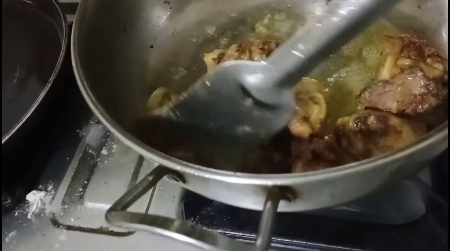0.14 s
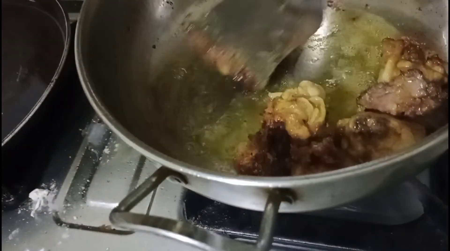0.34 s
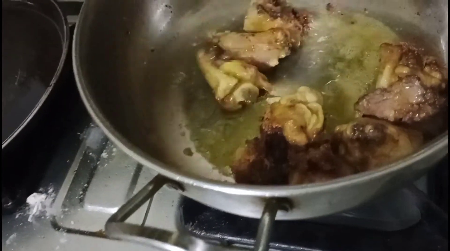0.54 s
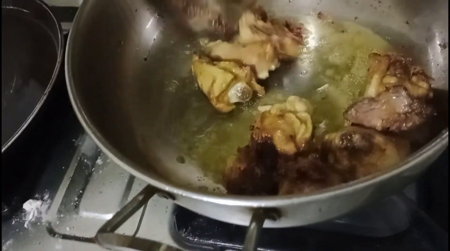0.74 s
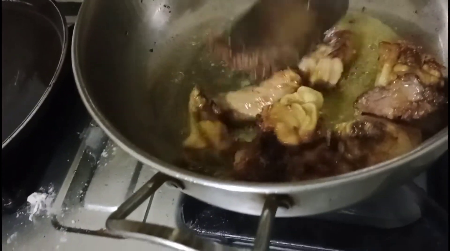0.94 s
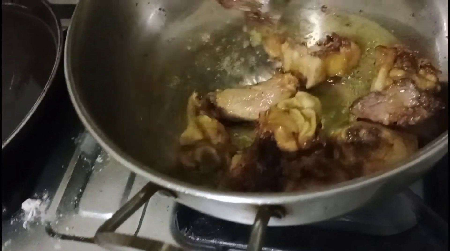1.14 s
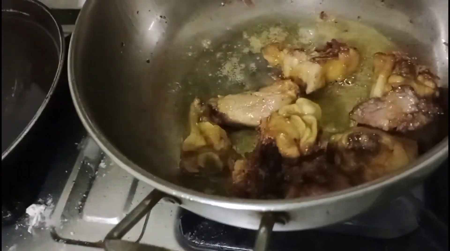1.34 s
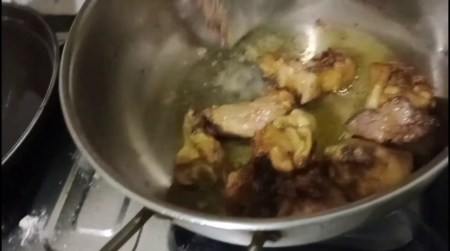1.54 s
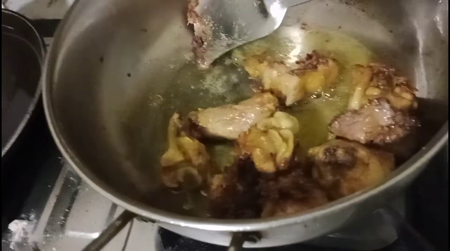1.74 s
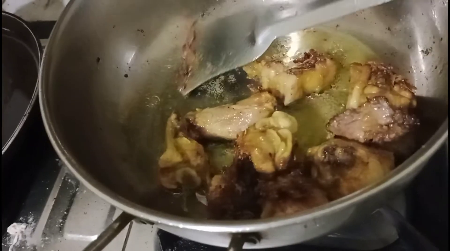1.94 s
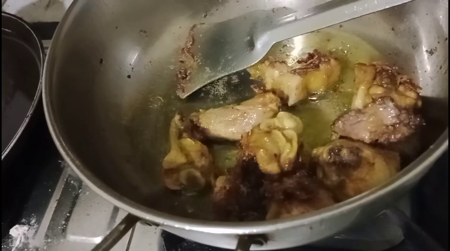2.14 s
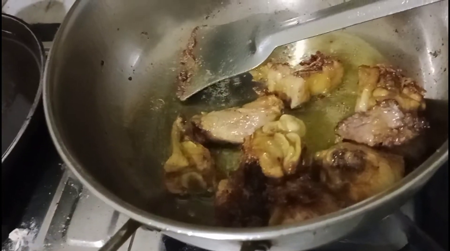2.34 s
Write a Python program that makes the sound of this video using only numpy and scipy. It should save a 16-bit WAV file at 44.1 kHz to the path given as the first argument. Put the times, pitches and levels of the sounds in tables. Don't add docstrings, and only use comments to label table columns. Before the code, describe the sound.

Chicken sizzling and crackling in hot oil while a metal spatula knocks against a steel pan

```python
import sys
import numpy as np
from scipy import signal
from scipy.fft import rfft, irfft
from scipy.io import wavfile
from scipy.ndimage import uniform_filter1d

SR = 44100
rng = np.random.default_rng(int(sys.argv[2]) if len(sys.argv) > 2 else 0)


def waveform_to_disk(signal):
    frames = np.transpose(np.atleast_2d(signal))
    scaled = np.clip(frames, -1, 1) * 32767
    samples = np.round(scaled).astype(np.int16)
    wavfile.write(sys.argv[1], SR, samples)


def voltage_ratio(decibels):
    exponent = np.asarray(decibels, float) / 20
    return 10 ** exponent


N = 110250
MIC_LAG_S = 0.0002495

# time in seconds, level in dB.
HEAT_DB = [(0, -28), (.25, -27), (.6, -26), (.8, -29), (1.0, -25.5), (1.5, -28), (1.7, -27.5), (1.9, -28.5),
           (2.2, -28.5), (2.5, -28)]


def frying():
    bubbles = swarm(1500, 1.7, 3.5, 1080, 11830, clump_db=3.5)
    crackles = swarm(500, 3.8, 1.92, 950, 16800, clump_db=4.5)
    oil = simmer((voltage_ratio(-2.5) * bubbles + voltage_ratio(-6) * crackles) * along(HEAT_DB))
    return oil + large_pops() + dry_snaps()


def hiss():
    return simmer(voltage_ratio(-1) * along(HEAT_DB) * noise(FIZZ_COLOUR, patchy_db=2.5, flicker_db=1.47))


# frequency in Hz, level in dB per Hz.
FIZZ_COLOUR = [(500, -19.5), (1300, -14), (2400, -8), (3700, -1.5), (5200, -1.5), (7400, -4), (9000, -6.5),
               (15600, -19.5)]


def swarm(per_s, spread_db, cycles, low_hz, high_hz, clump_db, count=24):
    clumps = voltage_ratio(clump_db * drift(N, 300, 200))
    bursts = rng.random(N) < clumps * per_s / SR
    size = voltage_ratio(spread_db * np.minimum(rng.exponential(1, N), 2.6)) * bursts
    kind = rng.integers(0, count, N)
    out = np.zeros((2, N))
    for k, (p, c, side) in enumerate(rng.random((count, 3))):
        hz = low_hz * (high_hz / low_hz) ** ((k + p) / count)
        shape = blip(hz, cycles * (0.5 + c), 0.097, MIC_LAG_S * (2 * side - 1))
        shape = shape * np.sqrt(hz / low_hz)
        out += signal.oaconvolve((size * (kind == k))[None], shape, axes=1)[:, :N]
    return evened(coloured(out, FIZZ_COLOUR))


def blip(hz, cycles, glide, lag_s):
    t = np.arange(600) / SR - MIC_LAG_S - np.array([[lag_s], [-lag_s]])
    u = np.maximum(t * hz / cycles, 0)
    swell = u * np.exp(1 - u * 3.9) * 3.98
    return swell * np.sin(2 * np.pi * cycles * u * (1 + glide * u))


# time in seconds, level in dB.
LARGE_DB = [(0, 0), (.3, -1.5), (.48, -1), (.63, 0), (.8, 2.5), (1.1, -2), (1.5, 1.5), (2.0, 3.5),
            (2.35, -2.5)]


def simmer(x):
    low = signal.sosfiltfilt(signal.butter(2, 2950, fs=SR, output="sos"), x)
    return x + (along(LARGE_DB) - 1) * low


POP_S, POP_GLIDE = 0.00077, 0.022
POP_T = np.arange(-200, 200) / SR

# time in seconds, level in dB, pitch in Hz, lead of the left side in radians.
POPS = [(0.0404, -17, 7000, -3), (0.1088, -25, 3680, 5), (0.1761, -19.5, 4500, 1),
        (0.2373, -23.5, 1770, -1.8), (0.239, -17, 4180, 0.1), (0.2512, -16, 3680, 1.9),
        (0.3881, -16, 4600, 1.1), (0.4615, -16, 5440, -2.2), (0.5162, -19, 5000, 1.7),
        (0.6042, -20, 4000, -1.5), (0.6091, -22.5, 2170, 3), (0.641, -20.5, 7300, 0.5),
        (0.6455, -18.5, 2110, 0), (0.646, -14.5, 6640, -2.5), (0.659, -20, 4160, 1.1),
        (0.7061, -35, 9450, 1), (1.0146, -21, 2470, -1), (1.1052, -23, 3660, 1), (1.1623, -28, 5200, -0.5),
        (1.1875, -19, 4200, 0.5), (1.233, -19, 3900, 1.5), (1.3754, -23, 3760, 2),
        (1.4278, -16.5, 3650, -3.0), (1.4641, -20.5, 2430, 0.5), (1.53, -20, 8050, 4),
        (1.7314, -16.5, 4240, 0.5), (1.7463, -28, 1400, -4), (1.7842, -19.5, 4300, -1.5),
        (1.8643, -14, 7050, -2), (1.8905, -16, 5230, 3), (1.9164, -17, 4890, -1.2), (1.9865, -30, 2955, 7),
        (2.0274, -20, 4180, -2), (2.0473, -12, 4680, 4), (2.079, -17, 3960, 0.8),
        (2.1194, -13.5, 4150, -1.7), (2.1372, -16.5, 2300, -1.0), (2.2383, -18, 5200, -1),
        (2.2509, -20, 2530, 0.5), (2.2702, -14.5, 5110, 1.3), (2.3178, -14.5, 7390, -1.9),
        (2.331, -17.5, 5480, 1.5), (2.3419, -20.5, 3320, -0.5), (2.3502, -17.5, 3570, -2.5),
        (2.3938, -17.5, 2860, 3), (2.4257, -22, 3200, -2.5), (2.4555, -20.5, 3800, -2),
        (2.4801, -21, 4260, 0)]


def large_pops():
    out = np.zeros((2, N))
    bell = np.exp(-0.5 * (POP_T / POP_S) ** 2)
    for s, db, hz, lead_rad in POPS:
        turn = 2 * np.pi * hz * POP_T * (1 + POP_GLIDE * POP_T / POP_S)
        turn = turn + np.array([[0.5], [-0.5]]) * lead_rad
        add(out, s + POP_T[0], voltage_ratio(db + 3.5) * bell * np.cos(turn))
    return out


# start in seconds, peak level in dB before the cap, about twice the band centre in
# Hz.
SNAPS = [(0.218, -19, 4000), (0.2413, -9, 3920), (0.2469, -1.5, 4220), (0.2684, -4, 4580),
         (0.2849, -9, 4430), (0.296, -5, 3500), (0.356, 4, 4950), (0.511, -7, 5150), (0.5367, -21, 4630),
         (0.6087, -10, 3840), (0.6463, -7, 4110), (0.705, -7, 6010), (1.0196, -7, 4570),
         (1.2122, -11.5, 4160), (1.256, -7, 4100), (1.285, -9, 4490), (1.3382, -6, 4210),
         (1.467, -10, 4200), (1.5048, -4.5, 4500), (1.5318, -4, 5330), (1.8444, 0, 4050),
         (1.855, -17, 4670), (1.8634, -12, 5940), (1.889, 5, 4730), (2.2771, -15, 4260),
         (2.3186, -1.5, 6300), (2.3757, -9, 4450), (2.3926, -15, 3890)]


def dry_snaps():
    t60_s, width_octaves, level_db, loudest_db = 0.007, 1.35, -3, -9
    out = np.zeros((2, N))
    size = len(POP_T)
    f = np.fft.rfftfreq(size, 1 / SR)
    decay = (POP_T >= 0) * voltage_ratio(-60 * abs(POP_T) / t60_s)
    rows = list(SNAPS) + [(s - POP_S, db + 3, hz) for s, db, hz, _ in POPS]
    for s, db, hz in rows:
        grit = rng.standard_normal((2, size))
        burst = (grit + 0.5 * grit[::-1]) * decay
        band = np.exp(-0.5 * (np.log2((f + 1) / (0.51 * hz)) / width_octaves) ** 2)
        burst = irfft(rfft(burst) * band, size)
        add(out, s + POP_T[0], voltage_ratio(min(db, loudest_db) + level_db) * burst / abs(burst).max())
    return out


# start in seconds, level in dB, t60 in seconds.
SPITS = [
    (0.344, -26, 0.067),
    (0.643, -16, 0.023),
    (0.7037, -14, 0.017),
    (1.512, -25, 0.12),
    (1.835, -20, 0.2),
    (2.033, -22.5, 0.17),
    (2.375, -23.5, 0.041),
]


def spits():
    out = np.zeros((2, N))
    t = np.arange(SR // 4) / SR
    for s, db, t60 in SPITS:
        grit = rng.standard_normal((2, len(t)))
        burst = evened(coloured(grit, [(1000, -20), (4000, -8), (8000, 8), (15000, -16)]))
        add(out, s, burst * np.minimum(t / 0.0033, 1) * voltage_ratio(db - 60 * t / t60))
    return out


def bowl(x, count=7):
    spot = np.repeat(rng.integers(0, count, N // 300 + 1), 300)[:N]
    out = np.zeros((2, N))
    for k in range(count):
        here = uniform_filter1d(1.0 * (spot == k), size=200)
        out += echoes(x * here, 0.00073, 0.009, 0.012)
    return out


# frequency in Hz, level in dB, t60 in seconds.
EDGE_MODES = [(5146, 6.5, 0.078), (5400, 3, 0.05), (6000, 2, 0.056), (6650, 7, .07), (7066, 8, 0.062),
              (7960, 1, 0.033)]
# frequency in Hz, level in dB, t60 in seconds.
FLAT_MODES = [(1850, -4, 0.12), (2720, 7, 0.038), (4050, 11, 0.016), (5760, 6, 0.041), (6100, 5, 0.01),
              (7620, -5, .03), (8600, -26, 0.049)]
# start in seconds, pan in dB, centre of pan ring in Hz, ring length share, blade in dB.
EDGE_KNOCKS = [
    (0.192, -17, 815, 0.83, -22.5),
    (0.7315, -6.5, 720, 0.57, -13),
    (0.7428, -11, 930, 0.11, -18),
    (0.967, -29.5, 604, 0.29, -46),
    (2.165, -29, 700, 0.43, -43),
]
# start in seconds, pan in dB, centre of pan ring in Hz, ring length share, blade in dB.
FLAT_KNOCKS = [
    (0.857, -24.5, 690, 0.48, -30),
    (1.6479, -11.5, 830, 0.32, -10.5),
    (1.742, -26, 1300, 0.13, -48),
    (1.8234, -17.5, 820, 0.94, -14.5),
    (1.8289, -32, 950, 0.99, -10),
    (1.8347, -35, 790, 0.74, -14),
]


def spatula():
    out = drag()
    for blade, rows in ((EDGE_MODES, EDGE_KNOCKS), (FLAT_MODES, FLAT_KNOCKS)):
        for s, *how in rows:
            add(out, s, knock(blade, *how))
    return out


# frequency in Hz, level in dB, t60 in seconds.
PAN_MODES = [(172, -15, 1), (264, -3, 0.48), (389.4, -11, 0.54), (414, -12.5, 0.25), (435, -4, 0.26),
             (547.6, 1, 0.12), (633, 3, 0.2), (686.6, -7, 0.31), (746, -4.5, 0.37), (1000, 3.5, 0.088),
             (1138, 5.5, 0.16), (1314, -18, 0.09), (1580, -14, 0.032)]
# frequency in Hz, level in dB.
CRACK_COLOUR = [(300, -14), (1500, -7), (5000, 13), (9000, 9), (15500, -10)]


def knock(blade, pan_db, centre_hz, length, blade_db):
    size = SR // 3
    t, hz = np.arange(size) / SR, np.fft.rfftfreq(size, 1 / SR)

    def near(f):
        return np.exp(-0.5 * (np.log2((f + 1) / centre_hz) / 0.92) ** 2)

    a, b = rng.standard_normal((2, size))
    thud = evened(irfft(rfft(np.array([a + b / 4, a - b / 4])) * near(hz), size))
    thud = 0.34 * thud * voltage_ratio(6 - 60 * t / (length * 0.13))
    blow = voltage_ratio(1.5 - 60 * t / 0.0057) * np.sin(2 * np.pi * 1.27 * centre_hz * t)
    modes = [(f, db, length * t60) for f, db, t60 in PAN_MODES]
    pan = ring(modes, t, near(np.array(PAN_MODES)[:, :1])) + thud + blow

    crack = coloured(rng.standard_normal((2, size)), CRACK_COLOUR) * voltage_ratio(-60 * t / 0.023)
    crack = crack / abs(crack).max() * voltage_ratio(13.5)
    onset = np.minimum(t / 0.00043, 1)
    return -onset * (voltage_ratio(pan_db) * pan + voltage_ratio(blade_db) * (ring(blade, t) + crack))


# time in seconds, level in dB.
DRAG_PRESSURE_DB = [(0, -61), (.17, -55), (.25, -40.5), (.38, -52), (.45, -56), (.74, -51.5), (.82, -44),
                    (1.05, -47), (1.15, -56.5), (1.6, -54), (1.7, -61), (1.88, -35.5), (2.0, -47),
                    (2.1, -54), (2.3, -58.5), (2.5, -57)]
# frequency in Hz, level in dB.
DRAG_MODES = [(182, 1.5), (292, -7), (345, -13), (425, -0.5), (535, 1)]


def drag():
    slips = voltage_ratio(3.2 * np.minimum(rng.exponential(1, N), 2)) * (rng.random(N) < 300 / SR)
    slips = slips * rng.choice([-1., 1.], N)
    t = np.arange(SR // 2) / SR
    body = ring([(hz, db, 0.3) for hz, db in DRAG_MODES], t)
    hum = evened(signal.oaconvolve(slips[None], body, axes=1)[:, :N])
    rasp_colour = [(120, -14), (350, 0), (750, 4), (1300, -6), (2500, -30)]
    rasp = noise(rasp_colour, patchy_db=2, flicker_db=4.5)
    return along(DRAG_PRESSURE_DB) * (voltage_ratio(-1) * hum + voltage_ratio(-3) * rasp)


# frequency in Hz, correlation up to 1.
LIKENESS = [(60, 0.65), (180, 0.79), (550, 0.62), (1650, 0.54), (4970, 0.16), (15000, -0.24)]


def likeness(hz):
    return np.clip(read(LIKENESS, hz), 0, 1)


def ring(modes, t, weight=1):
    hz, db, t60 = np.transpose(modes)[:, :, None]
    side = rng.choice([-1., 1.], hz.shape) * np.array([1, -1])[:, None, None]
    turn = side * np.pi / 4 * (1 - likeness(hz))
    sines = weight * voltage_ratio(db - 60 * t / t60) * np.sin(2 * np.pi * hz * t + turn)
    return sines.sum(1) / np.sqrt(len(modes))


def noise(points, patchy_db, flicker_db):
    frames, hz = N // 64 + 5, np.fft.rfftfreq(256, 1 / SR)
    patches = uniform_filter1d(rng.standard_normal((129, frames)), size=5, axis=0)
    patches = evened(uniform_filter1d(patches, size=20, axis=1))
    flicker = drift(frames, 8)
    a, b = rng.standard_normal((2, N))
    same = likeness(np.fft.rfftfreq(N, 1 / SR))
    pair = np.array([a, irfft(same * rfft(a) + np.sqrt(1 - same ** 2) * rfft(b), N)])
    z = signal.stft(pair, nperseg=256, noverlap=192)[2]
    gain_db = patchy_db * (-1.5 + (hz[:, None] / 9000) ** 2) * patches + flicker_db * flicker
    z = z * voltage_ratio(gain_db)[:, :z.shape[-1]]
    return evened(coloured(signal.istft(z, nperseg=256, noverlap=192)[1][:, :N], points))


def echoes(x, start_s, t60, length_s):
    slots = np.arange(round(start_s * SR), round(length_s * SR), 20)
    shape = (2, len(slots))
    taps = np.zeros((2, slots[-1] + 20))
    np.put_along_axis(taps, slots + rng.integers(0, 20, shape), rng.choice([-1., 1.], shape), 1)
    taps *= voltage_ratio(-60 * np.arange(taps.shape[1]) / SR / t60)
    taps /= np.linalg.norm(taps, axis=1, keepdims=True)
    return signal.oaconvolve(x, taps, axes=1)[:, :N]


def evened(x):
    return x / np.sqrt(np.mean(x ** 2) + 1e-20)


def drift(shape, *widths):
    x = rng.standard_normal(shape)
    for width in widths:
        x = uniform_filter1d(x, size=width)
    return evened(x)


def read(points, hz):
    f, value = np.transpose(points)
    return np.interp(np.log(hz + 1), np.log(f + 1), value)


def along(curve):
    s, db = np.transpose(curve)
    return voltage_ratio(np.interp(np.arange(N) / SR, s, db))


def add(mix, s, sound):
    part = mix[..., round(s * SR):][..., :sound.shape[-1]]
    part += sound[..., :part.shape[-1]]


def coloured(x, points):
    size = x.shape[-1]
    return irfft(rfft(x) * voltage_ratio(read(points, np.fft.rfftfreq(size, 1 / SR))), size)


# frequency in Hz, level in dB per Hz.
MURMUR_COLOUR = [(40, 10), (119, -9.5), (200, -28.5), (330, -62), (480, 5), (845, 0.5), (2000, -47),
                 (2800, -25)]
# time in seconds, level in dB.
FAN_DB = [(0, -66), (.5, -66), (1.0, -62), (1.1, -56), (1.9, -57), (2.5, -59)]


def kitchen():
    waver = drift((2, N), 4000, 4000)
    turn = 2 * np.pi * np.cumsum(226 + waver[1]) / SR
    fan = along(FAN_DB) * voltage_ratio(5.5 * waver[0]) * np.sin(turn)
    return voltage_ratio(-46.5) * noise(MURMUR_COLOUR, patchy_db=1.0, flicker_db=3.5) + fan


def scene():
    oil = frying() + spits()
    near = oil + voltage_ratio(-5) * bowl(oil) + spatula()
    room = voltage_ratio(-5.5) * echoes(near, 0.008, 0.42, 0.37)
    return near + room + hiss() + kitchen()


def top_cut(x):
    return signal.sosfilt(signal.butter(12, 15710, fs=SR, output="sos"), x)


# frequency in Hz, left over right in dB.
BALANCE = [(60, 0), (130, -1), (290, 1), (640, -4), (1410, 0), (3100, -2), (6820, 2), (15000, -15.5)]
# frequency in Hz, level in dB.
MIC_COLOUR = [(25, -30), (130, -1.5), (8800, 0), (11500, -17), (15600, -24.5)]


def record(dry):
    limit_db, squeeze, ahead_s, recover_db_per_s = -20, 0.45, 0.012, 77
    lean = voltage_ratio(0.5 * read(BALANCE, np.fft.rfftfreq(N, 1 / SR)))
    x = coloured(irfft(rfft(dry) * np.array([lean, 1 / lean]), N), MIC_COLOUR)
    power_db = 10 * np.log10(abs(uniform_filter1d((x ** 2).mean(0), size=260)) + 1e-12)
    ahead = round(ahead_s * SR)
    power_db = np.append(power_db[ahead:], np.full(ahead, power_db[-1]))
    fall_db = np.arange(N) * recover_db_per_s / SR
    held_db = np.maximum.accumulate(power_db + fall_db) - fall_db
    over_db = np.maximum(held_db - limit_db, 0)
    return top_cut(x / voltage_ratio(squeeze * uniform_filter1d(over_db, size=150)))


dry = scene()
out = record(dry)
waveform_to_disk(out)
```